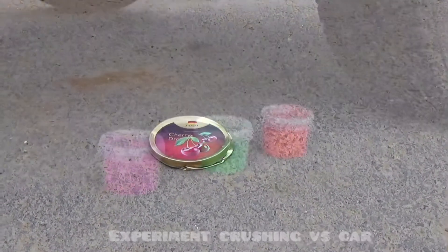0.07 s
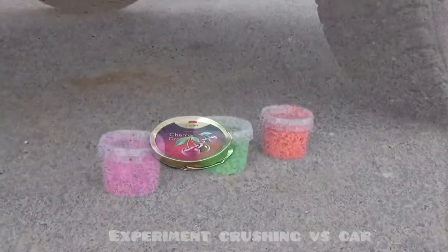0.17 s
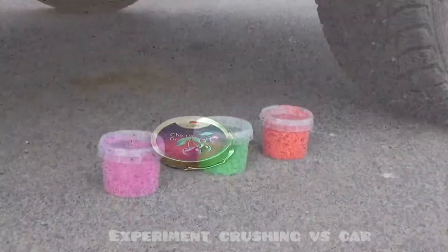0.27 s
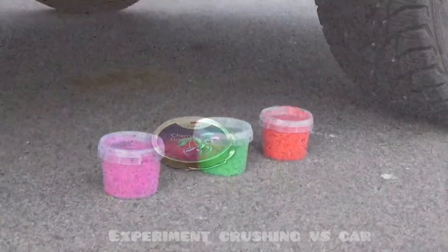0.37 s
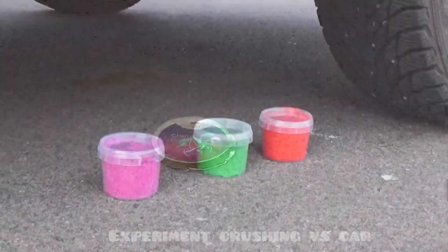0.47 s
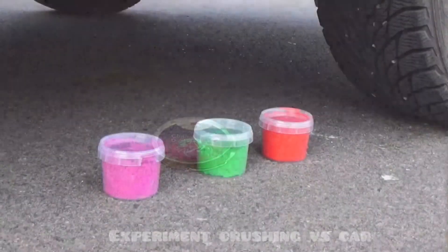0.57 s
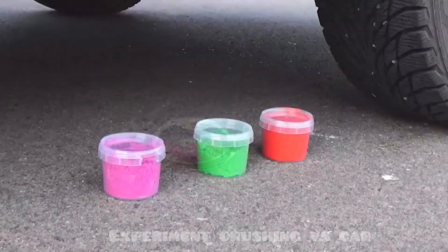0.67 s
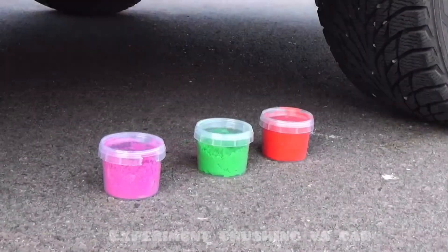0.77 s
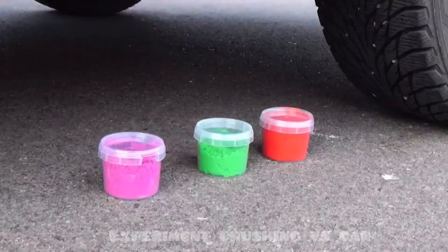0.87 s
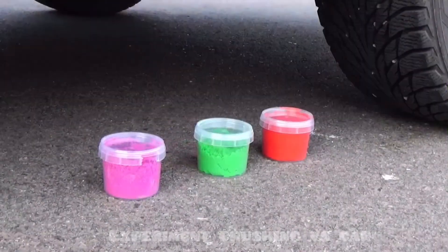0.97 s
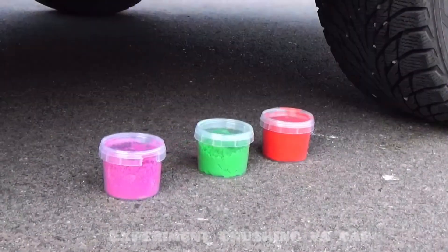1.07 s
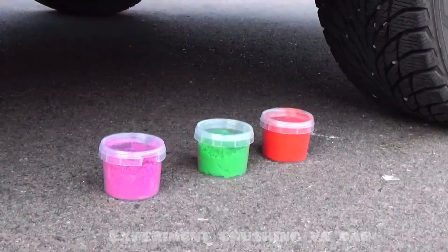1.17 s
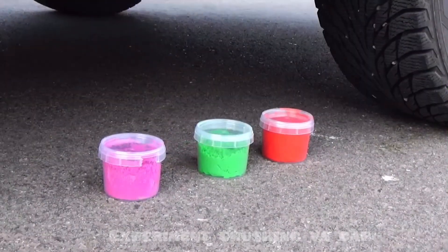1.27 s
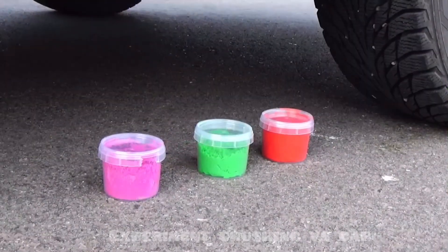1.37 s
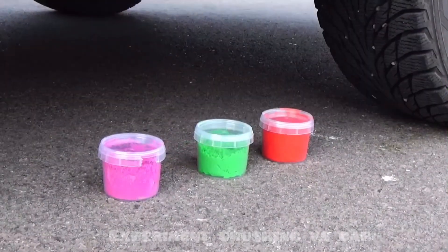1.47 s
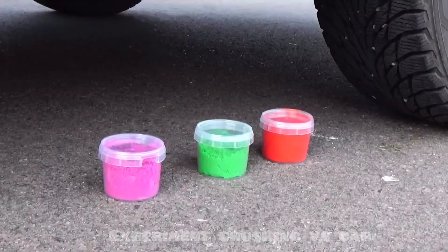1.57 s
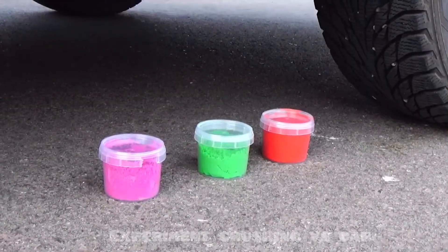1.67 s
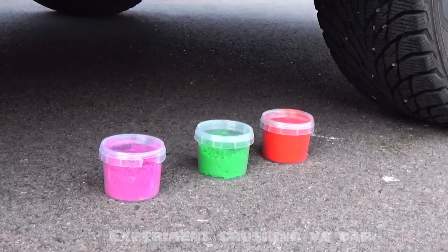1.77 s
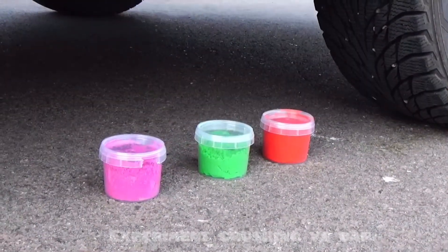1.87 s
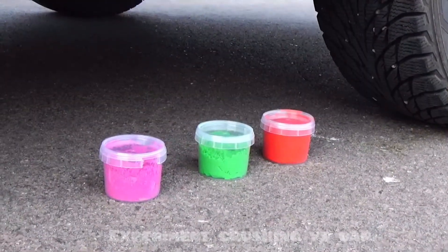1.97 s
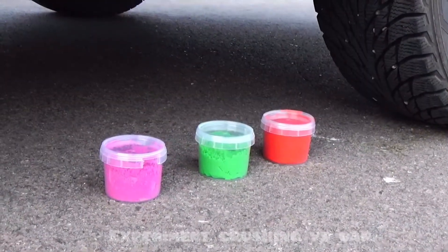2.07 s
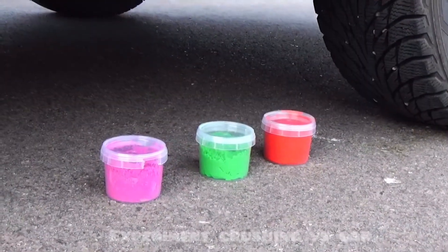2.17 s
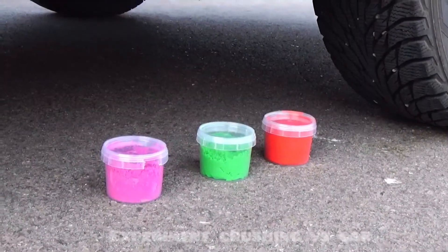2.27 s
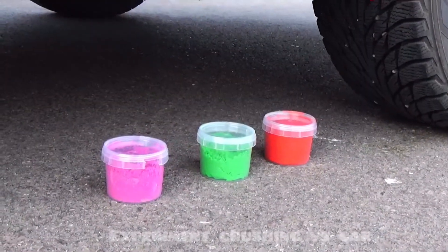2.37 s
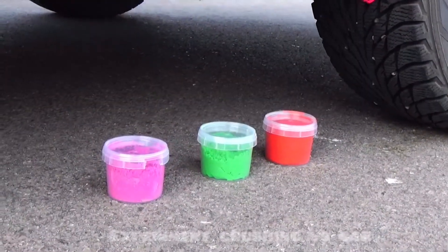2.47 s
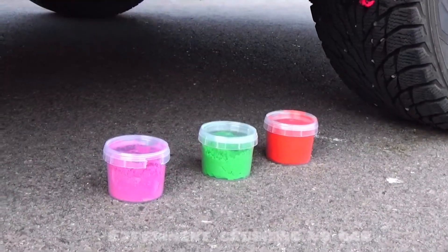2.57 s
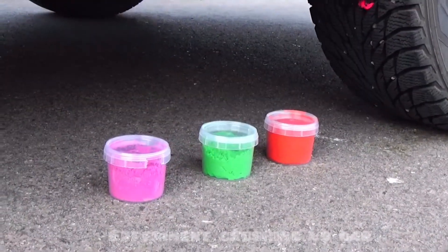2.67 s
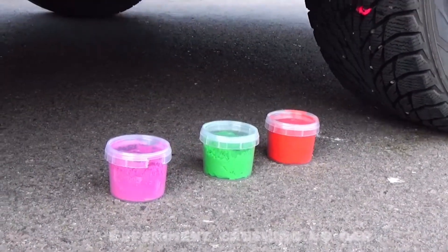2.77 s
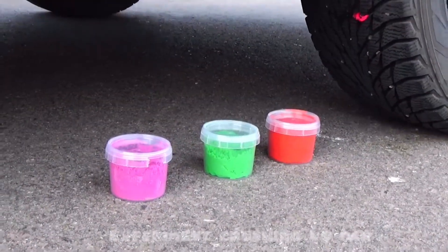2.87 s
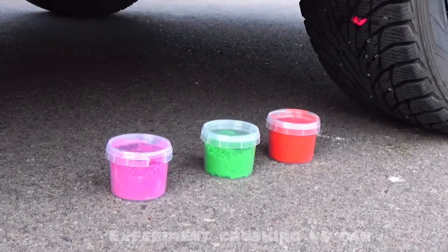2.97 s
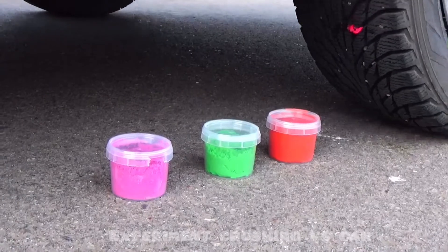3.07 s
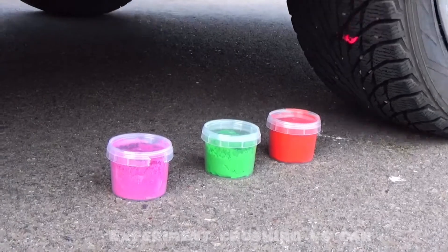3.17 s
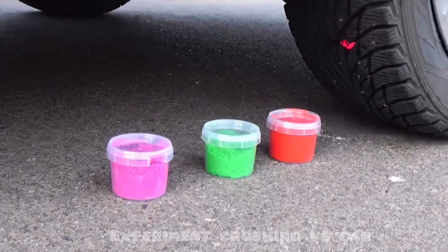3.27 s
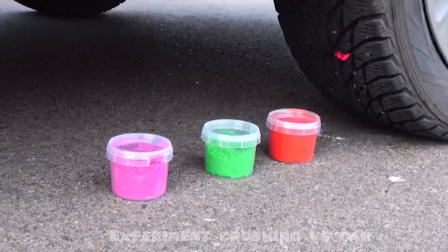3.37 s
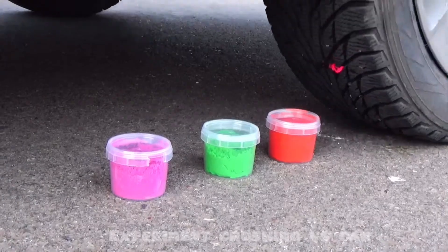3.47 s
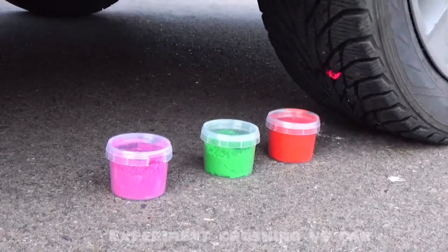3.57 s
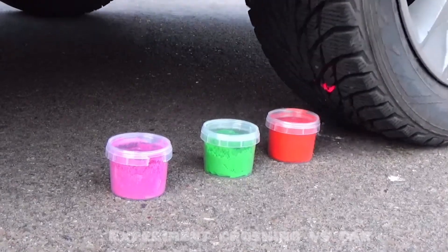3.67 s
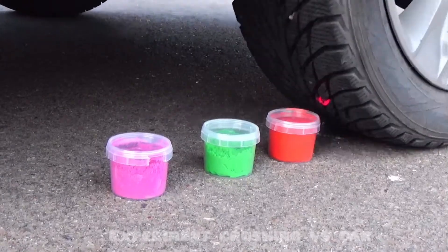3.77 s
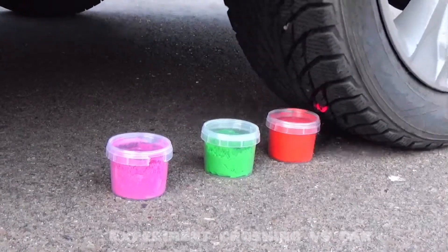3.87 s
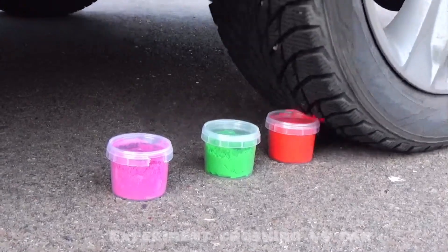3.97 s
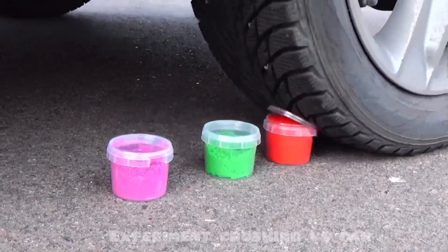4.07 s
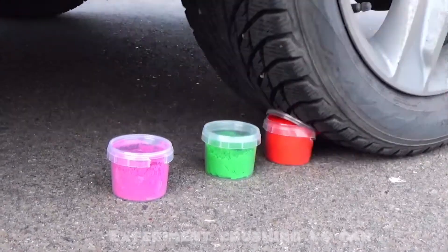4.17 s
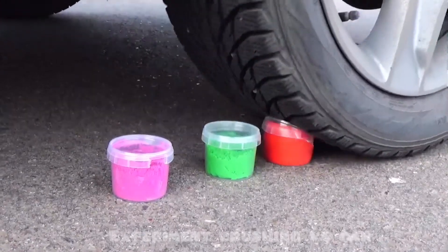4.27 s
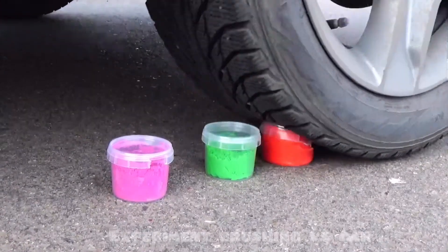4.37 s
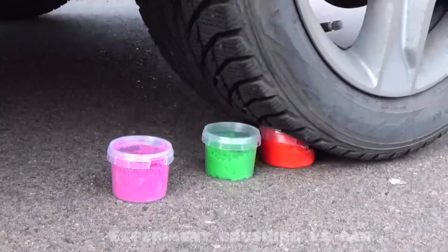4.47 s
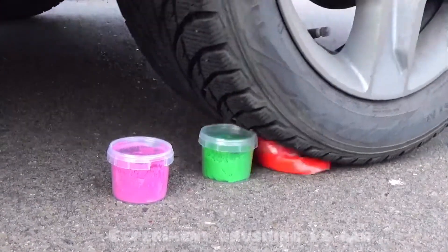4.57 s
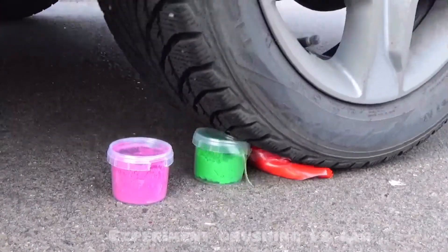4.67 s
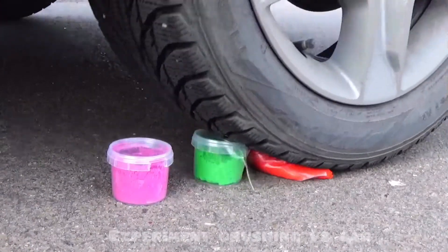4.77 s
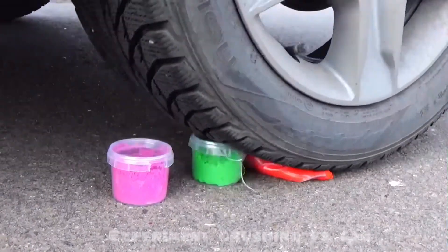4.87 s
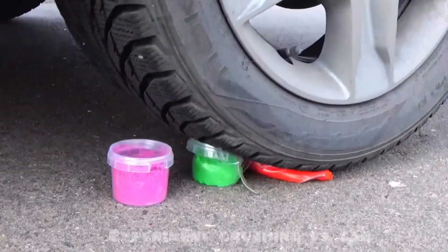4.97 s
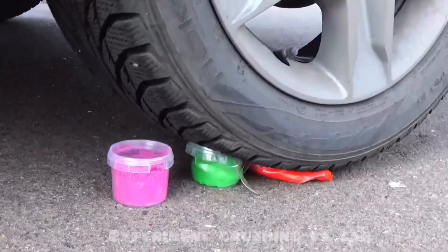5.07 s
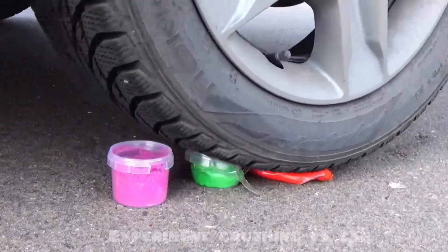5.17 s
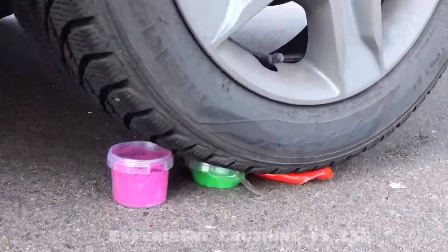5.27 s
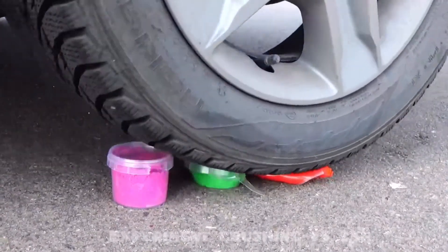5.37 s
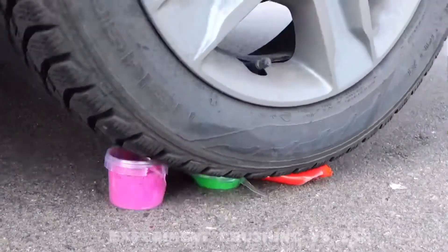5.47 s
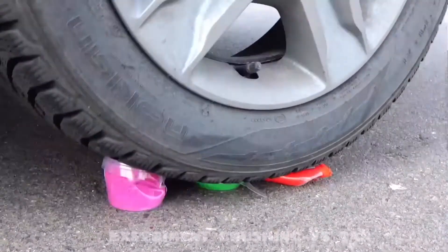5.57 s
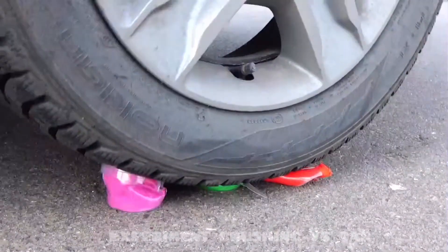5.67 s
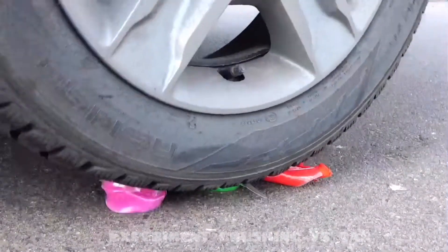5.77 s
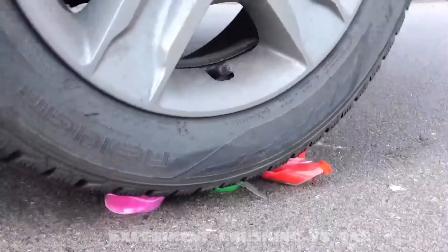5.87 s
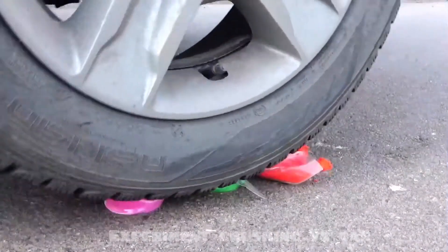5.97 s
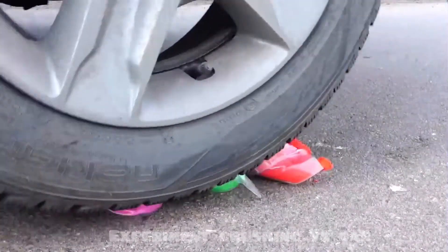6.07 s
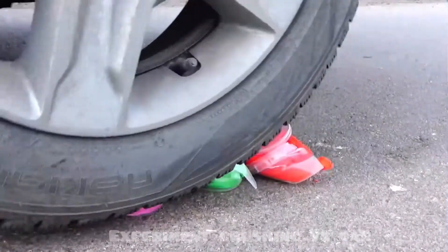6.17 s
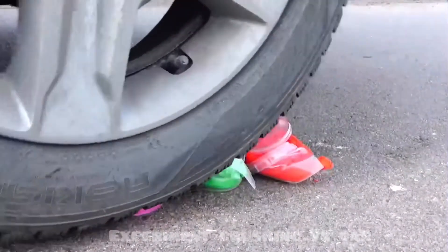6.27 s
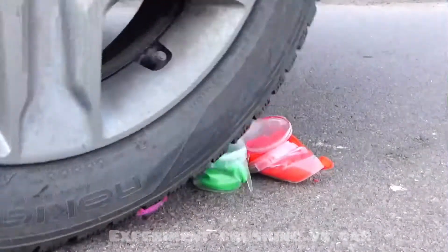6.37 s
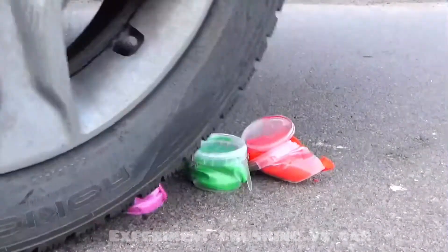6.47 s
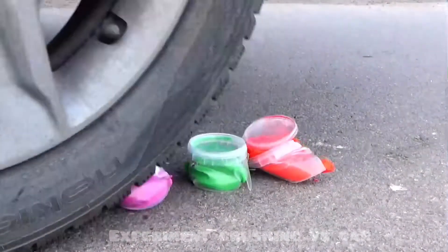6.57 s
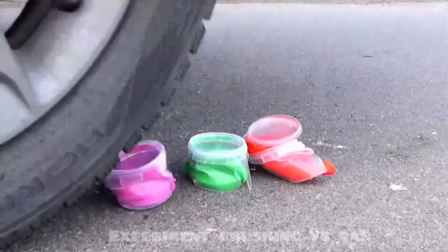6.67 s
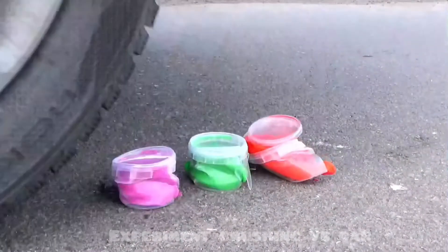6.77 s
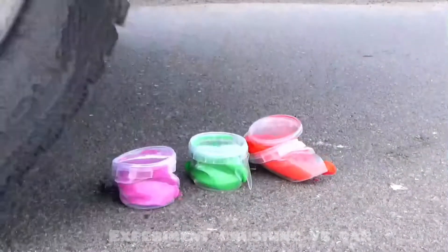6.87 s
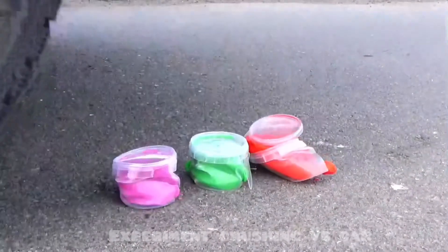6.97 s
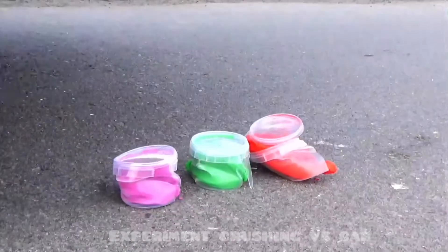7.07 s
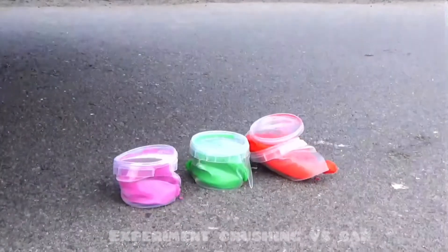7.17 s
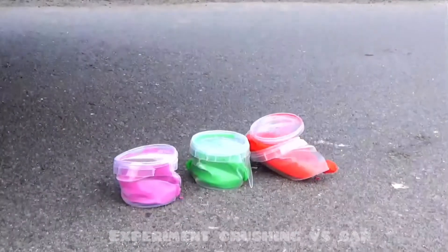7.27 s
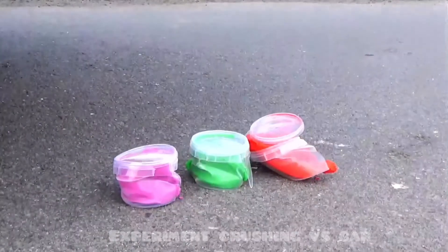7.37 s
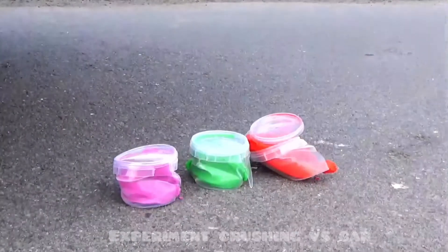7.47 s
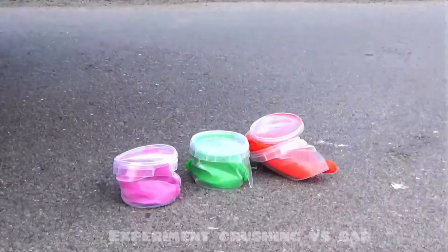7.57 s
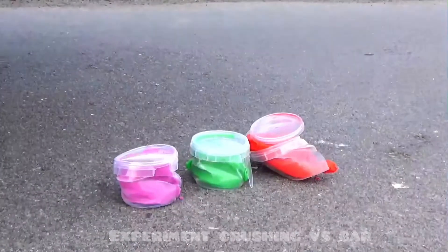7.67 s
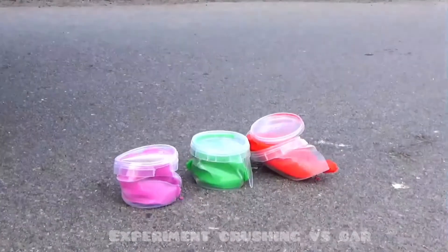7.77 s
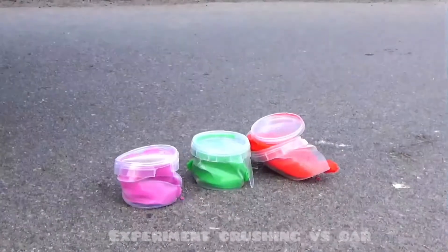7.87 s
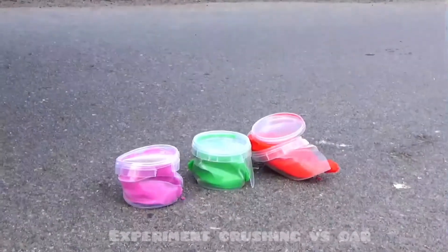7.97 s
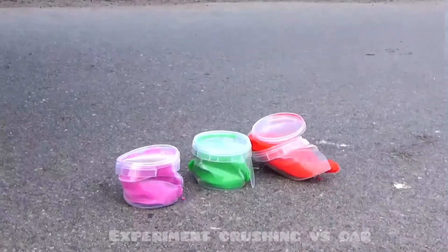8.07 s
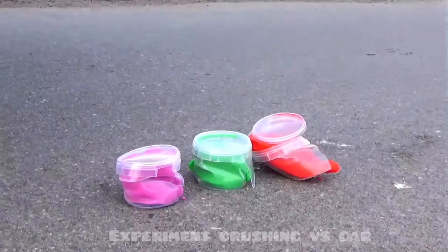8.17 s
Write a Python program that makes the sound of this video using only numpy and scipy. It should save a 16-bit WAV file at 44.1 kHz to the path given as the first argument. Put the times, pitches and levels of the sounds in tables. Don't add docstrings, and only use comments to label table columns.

```python
import sys
import numpy as np
from scipy import signal
from scipy.fft import rfft, irfft, next_fast_len
from scipy.io import wavfile
from scipy.ndimage import uniform_filter1d

SR = 44100
rng = np.random.default_rng(int(sys.argv[2]) if len(sys.argv) > 2 else 0)


def volts_from_decibels(level):
    exponent = np.asarray(level, float) / 20
    return 10 ** exponent


def persist_wave(psi):
    counts = np.round(np.clip(psi, -1, 1) * 32767).astype(np.int16)
    wavfile.write(sys.argv[1], SR, np.atleast_2d(counts).T)


N = 362943

# time in seconds, pitch in Hz.
FIRING_PITCH = [(0, 44.55), (.9, 44.7), (1.5, 44.95), (2.1, 43.65), (2.7, 42.5), (3.3, 42.25),
                (4.05, 42.05), (4.7, 42.55), (5.3, 42.05), (5.7, 41.35), (6.3, 43.0), (6.9, 45.4),
                (7.2, 45.75), (7.5, 45.4), (7.8, 46.25), (8.1, 46.95)]
# time in seconds, firing tone in dB, second order in dB, roar in dB.
ENGINE_LEVELS = [(0, -32.5, -30.5, -39.5), (.32, -34.5, -24, -34), (.8, -25.5, -20, -29),
                 (1.3, -23.5, -24.5, -29.5), (1.95, -23.5, -19.5, -29.5), (2.5, -27, -21, -30),
                 (3.05, -26, -28, -30), (3.55, -31, -24.5, -30), (4.1, -29.5, -23.5, -30.5),
                 (4.45, -26.5, -21, -28), (4.8, -29, -23.5, -33.5), (5.1, -31, -26, -32.5),
                 (5.6, -31.5, -31.5, -33.5), (6, -26.5, -22, -32.5), (6.74, -18.5, -11.5, -33.5),
                 (6.95, -21, -15.5, -33), (8.23, -19.5, -19, -34.5)]
# time in seconds, upper orders in dB, exhaust nearness 0-1, lean to the left in dB.
ROLLING_BY = [(0, -32, 0, 0), (.5, -23, 0, -1), (2.2, -23, 0, -1), (3, -24, .1, 0), (4, -26, .2, 0),
              (5, -28, .3, 0), (6.1, -28, .5, 1), (6.6, -22, .9, 1), (7.2, -20, 1, 1), (8.23, -19, 1, 2.5)]
# multiple of the firing pitch, level in dB.
BAY_ORDERS = [(.5, -11), (1.5, -20), (2.5, -22), (3, -10), (3.5, -19), (4, -18), (4.5, -12), (5, -20),
              (5.5, -15), (6, -27), (7, -26)]
PIPE_ORDERS = [(.5, -10), (1.5, -11), (2.5, -22), (3, -20), (3.5, -16), (4, -24), (4.5, -11), (5, -13),
               (5.5, -21), (6, -17), (7, -26)]
# pitch in Hz, level in dB re upper orders.
PANEL_HUMS = [(152, -21), (278, -18), (351, -12), (453, -16)]
# frequency in Hz, density in dB per Hz.
BAY_SPECTRUM = [(30, -1.5), (100, 1.5), (200, -6), (400, -8), (700, -10), (1000, -12), (1900, -17),
                (2350, -19), (3200, -21), (3500, -26), (4000, -15.5), (4400, -21), (4900, -23),
                (7000, -21.5)]
PIPE_SPECTRUM = [(30, -9.5), (100, 2), (250, -13), (330, -12.5), (720, -10), (880, -16.5), (1300, -16.5),
                 (2050, -24), (2800, -31), (3300, -29), (3900, -22.5), (4400, -30), (4800, -35),
                 (7000, -31)]
# centre in Hz, width in Hz, level in dB.
WHINES = [(670, 33, -37), (1800, 24, -49.5), (2135, 73, -40.5), (3386, 60, -41), (3570, 110, -41.5),
          (3740, 120, -41), (3962, 50, -38.5), (4300, 110, -46), (6510, 10, -45), (6380, 19, -53.5)]
# centre in seconds, level in dB, length in seconds, eddy rate in Hz.
GUSTS = [(.056, -24, 0.13, 130), (0.889, -18, .04, 130), (0.896, -22.5, 0.027, 300), (1.501, -21, .06, 120),
         (2.55, -23, .06, 110.4), (3.0, -19.5, .04, 135.4), (3.025, -17, .04, 85),
         (3.088, -18.5, 0.056, 110.3), (3.09, -21.5, .05, 170), (3.119, -15, 0.035, 89.7),
         (3.298, -23, .1, 90), (3.39, -20, .05, 135), (3.47, -20, .06, 145), (3.559, -17, .07, 91.7),
         (3.612, -17.5, .035, 115), (3.96, -15, .04, 90), (4.009, -19, .04, 115),
         (4.149, -22.5, .06, 119.5), (4.201, -22.5, 0.073, 94.7), (4.469, -24, .08, 251),
         (4.622, -12.5, 0.053, 94.6), (4.75, -21, .05, 64.6), (5.344, -16, .05, 95),
         (6.513, -24.5, .23, 109.2), (6.756, -24, .11, 109.5), (7.529, -24.5, .033, 110),
         (7.745, -25, 0.027, 200)]
# start in seconds, peak in dB, starting ring in Hz,
# t60 in seconds, fall of pitch as a share.
POPS = [(.342, -23, 1800, .25, 0), (.346, -29, 2560, .1, 0), (.33, -15, 240, .1, 0),
        (3.9655, -3, 850, .018, .25), (3.966, -8, 420, .03, .2), (4.7945, -6, 1300, .018, .5),
        (4.796, -13, 480, .02, .3), (5.2742, -2, 1200, .012, .5), (5.2745, -6, 420, .02, .2),
        (5.4585, -5, 480, .026, .5), (5.459, -9, 240, .03, .2), (5.957, -10, 1700, .018, .4),
        (5.84, -12, 1150, .02, .1), (3.974, -10, 900, .016, .3), (5.69, -15, 900, .014, .5),
        (6.1175, -2.5, 560, .022, .3), (6.119, -12, 270, .03, .2), (6.173, -10, 950, .014, .2),
        (6.228, -17, 700, .016, .2), (6.41, -10, 500, .025, .2), (6.414, -12, 1000, .02, .1),
        (6.415, -11, 2300, .014, .05), (5.609, -14, 500, .016, .3), (6.622, -12, 600, .016, .3)]
# peak time in seconds, peak in dB, ring in
# Hz, knock in Hz, knock in dB re ring.
SNAPS = [(3.5929, -15.5, 3510, 2170, 10.0), (3.8369, -8.5, 5210, 1505, -6),
         (3.9488, -14, 3770, 2370, -6), (3.961, -4.5, 3830, 2700, 4.4), (3.9673, -8.5, 4160, 1370, 6),
         (3.9729, -0.5, 6370, 2790, -5.1), (4.0317, -0.5, 6330, 2010, 1.5),
         (4.0779, -1, 3910, 2940, -9), (4.0852, -6, 6380, 1590, -5.7), (4.1416, -4, 4900, 1415, 0),
         (4.2669, -7.5, 4390, 2000, -4), (4.3346, -7.5, 6910, 1700, -14.5),
         (4.4124, -12.5, 4030, 1820, -6), (4.4344, -11, 3840, 2140, -1.4),
         (4.448, -3, 5180, 2000, -2), (4.4565, -6.5, 3780, 2670, -1.8), (4.4723, -9, 6740, 2690, 0),
         (4.5614, -1.5, 6330, 3200, -13.5), (4.5644, -2, 7170, 2670, -9),
         (4.5863, -3.9, 4480, 1240, -13), (4.597, -6.5, 4050, 2650, -10.8),
         (4.6526, -0.5, 5760, 905, -6.5), (4.658, -3, 5360, 900, -15.0),
         (4.817, 1, 6530, 1083, -3.5), (4.8452, -29, 4600, 900, 8.6),
               (4.9046, -6.5, 5700, 950, -10.9), (4.9432, -3, 4880, 2250, -5),
               (4.9831, -16.1, 4970, 900, -1), (5.0286, -7, 5560, 1080, -10.8),
               (5.1907, -2, 3670, 1370, -1.5), (5.281, -4.5, 5730, 1120, -12),
               (5.4811, -2, 3900, 1810, -10), (5.4884, -0.4, 6650, 1290, -8),
               (5.519, -5.5, 6240, 1490, -0.6), (5.5917, -10, 5620, 1530, -21),
               (5.65, -18.5, 6670, 2930, -10), (5.6889, -17.1, 3380, 1060, 5), (5.833, -5.5, 5700, 904, -7),
               (5.8401, -6.1, 4160, 1110, -3), (5.8595, -2, 3940, 1290, -11), (5.9583, -9.5, 4650, 900, 11),
               (6.1175, -12.5, 3960, 1650, 14), (6.315, -25, 3810, 1060, 5), (6.3417, -13, 4100, 2680, 12),
               (6.398, -23.5, 3770, 1870, -1), (6.4096, -6, 5490, 2600, 1.5),
               (6.4161, -3.5, 3160, 2350, 7.5), (6.4323, -13.5, 6200, 900, 0),
               (6.6234, -6.5, 3940, 907, -5), (6.6448, -18, 6850, 900, 0)]
# start in seconds, level in dB, tyre ring in Hz, t60 in seconds.
THUMPS = [
    (3.962, -22, 88, 0.16),
    (4.462, -17.5, 143, 0.72),
    (4.615, -10.5, 110, 0.13),
    (4.7, -15.5, 151.4, 0.57),
    (5.346, -13.5, 150, 0.76),
    (6.412, -11, 152, 0.11),
    (6.46, -21, 151, .7),
]
# start in seconds, rise in seconds, fall in seconds, top hiss in dB, middle part in dB re hiss.
SQUIRTS = [(3.976, .015, 0.052, -17.5, -2.5), (4.036, 0.012, .034, -23, -3),
           (4.452, 0.0091, 0.041, -17, -2), (4.567, .043, .036, -15.5, -7), (5.195, 0.033, .035, -19, 0.5),
           (5.285, 0.031, 0.039, -18.5, -7), (5.493, 0.0029, 0.038, -30, -3),
           (5.863, .004, 0.023, -26.5, -20), (6.406, 0.011, 0.022, -21.5, 1),
           (5.834, 0.0073, 0.013, -22.5, -1.5)]
# frequency in Hz, density in dB per Hz.
JET_SPECTRUM = [(200, 0), (420, -3), (1000, -2), (1300, -1), (1600, -5), (2100, -2), (2500, -7),
                (3000, -11), (4100, -3), (4600, -5), (5200, -9), (7000, -10)]
# centre in seconds, level in dB, ring in Hz, length in seconds.
CAVITIES = [(4.001, -23, 1790, .04), (3.993, -23.5, 2500, .03), (4.467, -23.5, 3970, 0.028),
            (4.8, -24, 500, .04), (4.601, -23.5, 3900, .06), (4.6, -24, 1230, .05),
            (5.223, -23.5, 2058, .045), (5.223, -29, 1150, .04), (5.305, -21.5, 400, .06),
            (5.315, -25, 620, .035), (5.317, -20.5, 4120, .05), (5.299, -27, 2300, 0.045),
            (5.222, -22.5, 3950, .045), (4.045, -28, 4050, 0.023), (5.51, -28, 4000, .04),
            (5.4, -34.5, 4300, .04), (3.99, -23, 3600, .03)]
# centre in seconds, depth in dB, length in seconds.
BASS_CUTS = [(0.918, -9, 0.024), (2.802, -6.5, 0.25), (3.179, -8, 0.025), (3.784, -5.5, 0.12),
             (4.06, -15.5, 0.074), (4.157, -11, 0.068), (4.407, -4.5, 0.063), (4.556, -21, 0.033),
             (4.686, -19.5, .05), (5.3, -17.5, .09), (5.5, -23, 0.099), (5.666, -7.5, 0.045),
             (5.895, -22.5, .05)]
# frequency in Hz, likeness 0-1.
LIKENESS = [(45, 0.995), (90, 0.96), (160, 0.96), (420, 0.93), (1130, 0.91), (2990, 0.99), (7950, 0.95)]
# frequency in Hz, left-right difference in dB.
CAR_LEAN = [(45, 1.5), (85, 2.5), (140, -2.5), (310, 7), (690, 6), (1560, 3.5), (3520, 1.5), (7950, 0)]
TUB_LEAN = [(60, -10), (200, 3.5), (690, 4.5), (2340, 3), (7950, 2)]
# frequency in Hz, gain in dB.
BAND_EDGE = [(7330, 0), (7370, -22), (7460, -35), (8600, -44), (10500, -85)]
TOP_HZ = 7000


def evened(x):
    return x / np.sqrt(np.mean(x ** 2) + 1e-20)


def read(points, hz):
    f, value = np.transpose(points)
    return np.interp(np.log(hz + 1), np.log(f + 1), value)


def curves(rows, t):
    s, *columns = np.transpose(rows)
    return [np.interp(t, s, c) for c in columns]


def add(mix, s, sound):
    part = mix[round(s * SR):][:len(sound)]
    part += sound[:len(part)]


def wander(smooth, count=1):
    width = max(int(smooth / 16), 1)
    steps = rng.standard_normal((count, N // 16 + 2))
    steps = uniform_filter1d(uniform_filter1d(steps, width), width)
    return np.squeeze([np.interp(np.arange(N) / 16, np.arange(len(s)), evened(s)) for s in steps])


def band(x, lo_hz, hi_hz, order=2):
    return signal.sosfilt(signal.butter(order, [lo_hz, hi_hz], "band", fs=SR, output="sos"), x)


def padded_hz():
    size = next_fast_len(N // 2 + 1, True) * 2
    return size, np.fft.rfftfreq(size, 1 / SR)


def colour(x, points):
    size, hz = padded_hz()
    return irfft(rfft(x, size) * volts_from_decibels(read(points, np.minimum(hz, TOP_HZ))), size)[:N]


def bass_cut(t):
    return sum(db * np.exp(-((t - s) / (0.51 * length)) ** 2) for s, db, length in BASS_CUTS)


def engine_orders(t):
    hz, = curves(FIRING_PITCH, t)
    first_db, second_db, _ = curves(ENGINE_LEVELS, t) + bass_cut(t)
    upper_db, near, _ = curves(ROLLING_BY, t)
    turns = np.cumsum(hz * (1 + 0.0023 * wander(1502))) / SR
    tone = volts_from_decibels(first_db + 1.2 * wander(2400)) * np.cos(2 * np.pi * turns)
    tone += volts_from_decibels(second_db + 0.88 * wander(1500)) * np.cos(4 * np.pi * turns + 0.9)
    shakes = wander(1600, count=len(BAY_ORDERS))
    for (k, bay_db), (_, pipe_db), shake in zip(BAY_ORDERS, PIPE_ORDERS, shakes):
        level_db = upper_db + (1 - near) * bay_db + near * pipe_db + 1.5 * shake
        tone += volts_from_decibels(level_db) * np.cos(2 * np.pi * (k * turns + rng.random()))
    tone += panel_hums(t, upper_db, near)
    return np.sqrt(2) * tone, turns


def panel_hums(t, upper_db, near):
    hum = np.zeros(N)
    for (hz, db), shake in zip(PANEL_HUMS, wander(1100, count=len(PANEL_HUMS))):
        level = volts_from_decibels(upper_db + db + 3.2 * shake) * (1 - near) ** 2
        hum += level * np.cos(2 * np.pi * hz * t + .8 * shake[::-1])
    return hum


def engine_roar(t, turns):
    frames, hz = N // 512 + 5, np.fft.rfftfreq(2048, 1 / SR)
    at = np.arange(frames) * 512 / SR
    near = curves(ROLLING_BY, at)[1]
    low_db = curves(ENGINE_LEVELS, at)[2] + 0.067 * bass_cut(at)
    high_db = low_db + 3 * (1 - near) - 1.23 * near
    a, b, c, d, patches = rng.standard_normal((frames, 1025, 5)).T
    patches = evened(uniform_filter1d(uniform_filter1d(patches, 18, 0), 5, 1))

    held = np.minimum(hz, TOP_HZ)
    shape = volts_from_decibels(np.outer(read(BAY_SPECTRUM, held), 1 - near) + np.outer(read(PIPE_SPECTRUM, held), near))
    below = hz < 1500
    for part, gauged, db in (below, below & (hz > 300), low_db), (~below, ~below, high_db):
        shape[part] *= volts_from_decibels(db) / np.sqrt((shape[gauged] ** 2).sum(0))
    for f, width, db in WHINES:
        peak = np.exp(-((hz - f) / (width + 12)) ** 2)
        shape += np.outer(peak / np.linalg.norm(peak), volts_from_decibels(db + high_db + 20.5) * (1 - near))

    z = np.array([a + 1j * b, c + 1j * d]) * shape * volts_from_decibels(1.17 * patches)
    noise = 1.39 * signal.istft(z, nperseg=2048, noverlap=1536)[1][:, :N]
    puffs = 1 + 0.035 * np.cos(2 * np.pi * turns) + 0.047 * np.cos(np.pi * turns)
    return noise * puffs * volts_from_decibels(0.15 * wander(510))


def gusts(t):
    lumps, out = rng.standard_normal((2, N)), np.zeros((2, N))
    for s, db, length, hz in GUSTS:
        now = slice(max(round((s - length) * SR), 0), round((s + length) * SR))
        shape = np.exp(-((t[now] - s) / (0.43 * length)) ** 2)
        swing = np.sqrt(2) * np.cos(2 * np.pi * hz * (t[now] - s))
        ragged = evened(band(lumps[:, now], hz / 1.8, hz * 1.83))
        out[:, now] += volts_from_decibels(db) * shape * (swing * [[1], [.6]] + 0.49 * ragged)
    return out


def pops():
    out, u = np.zeros(N), np.arange(2400) / SR
    for s, db, hz, t60, sag in POPS:
        fade = volts_from_decibels(db - 60 * u / t60) * np.minimum(u / 0.00024, 1)
        pitch = hz * (1 - sag * (1 - np.exp(-u / 0.0023)))
        add(out, s, -fade * np.sin(2 * np.pi * np.cumsum(pitch) / SR))
    return out


def snaps():
    out, u = np.zeros(N), np.arange(2400) / SR
    for s, db, hz, knock_hz, knock_db in SNAPS:
        fade = volts_from_decibels(-60 * u / 0.008) + 0.08 * volts_from_decibels(-60 * u / 0.042)
        burst = np.sign(rng.standard_normal(len(u))) * fade * np.minimum(u / 0.0007, 1) ** 2
        burst[34] += 1.6
        wide = band(burst, 2600, 9000) + 0.5 * band(burst, 500, 2600)
        struck = volts_from_decibels(-60 * u / 0.0083) * np.minimum(u / 0.00042, 1)
        knock = volts_from_decibels(knock_db) * min(knock_hz / 1150, 1) * np.sin(2 * np.pi * knock_hz * u)
        rings = np.sin(2 * np.pi * hz * u) + knock
        crack = 1.2 * volts_from_decibels(-0.6 * max(knock_db, 0)) * wide / abs(wide).max()
        snap = crack + struck * rings / abs(rings).max()
        add(out, s - 0.0008, volts_from_decibels(db + 4.5) * snap / abs(snap).max())
    return out


def thumps():
    out, u = np.zeros(N), np.arange(SR // 2) / SR
    for s, db, hz, t60 in THUMPS:
        add(out, s, volts_from_decibels(db - 60 * u / t60) * np.minimum(u / 0.0018, 1) * np.sin(2 * np.pi * hz * u))
    return out


def squirts(t):
    grain_db = 2.2 * wander(34) + 1.5 * wander(260)
    air = colour(rng.standard_normal(N) * volts_from_decibels(grain_db), JET_SPECTRUM)
    edges_hz = (3000, 9000), (1500, 3000), (250, 1500)
    parts = np.array([evened(band(air, *edges, order=3)) for edges in edges_hz])
    hiss, middle, low = parts * volts_from_decibels(2.0 * wander(90, count=3))
    out = np.zeros(N)
    for s, rise, fall, db, middle_db in SQUIRTS:
        now = slice(round(s * SR) - 100, round((s + rise + fall) * SR) + 100)
        u = t[now] - s
        dying = np.clip((u - rise) / fall, 0, 1)
        level_db = db + 0.3 - 0.5 * np.clip(1 - u / rise, 0, 1) - 16 * dying ** 1.23
        gate = np.clip(np.minimum(u, rise + fall - u) / 0.0023 + .5, 0, 1)
        lingers_db = 2 * dying
        middle_gain, low_gain = volts_from_decibels(middle_db + .4 * lingers_db), volts_from_decibels(-6 + lingers_db)
        jet = hiss[now] + middle_gain * middle[now] + low_gain * low[now]
        out[now] += gate * volts_from_decibels(level_db) * jet
    return out


def cavities():
    sharpness, slide = 4.5, .12
    out, u = np.zeros(N), np.arange(-4000, 4000) / SR
    for s, db, hz, length in CAVITIES:
        breath = rng.standard_normal((2, len(u)))
        r = np.exp(-np.pi * hz / sharpness / SR)
        fuzz = signal.lfilter([1], [1, -2 * r, r * r], breath[0] + 1j * breath[1])
        pitch = hz * (1 - slide * np.tanh(u / length))
        ring = (fuzz * np.exp(2j * np.pi * np.cumsum(pitch) / SR)).real
        add(out, s + u[0], volts_from_decibels(db) * evened(ring) * np.exp(-(u / (0.67 * length)) ** 2))
    return out


def ground_scatter(x):
    u = np.arange(3000) / SR
    tails = rng.standard_normal((2, 3000)) * volts_from_decibels(-60 * u / 0.1) * (u > .001)
    return [signal.oaconvolve(x, evened(k) / np.sqrt(3000))[:N] for k in tails]


def ports(x, lean, other):
    size, hz = padded_hz()
    same = read(LIKENESS, hz)
    mid = np.sqrt((1 + same) / 2) * rfft(x, size)
    side = np.sqrt((1 - same) / 2) * rfft(other, size)
    balance = volts_from_decibels(np.outer([.5, -.5], read(lean, hz)))
    return irfft(np.array([mid + side, mid - side]) * balance, size)[:, :N]


def scene():
    t = np.arange(N) / SR
    tone, turns = engine_orders(t)
    noise = engine_roar(t, turns) + gusts(t)
    crush = pops() + snaps() + thumps() + squirts(t) + cavities()
    echo, other = ground_scatter(crush)
    car = ports(tone + noise[0], CAR_LEAN, np.roll(tone, 180) + noise[1])
    car *= volts_from_decibels(np.outer([.5, -.5], curves(ROLLING_BY, t)[2]))
    return car + ports(crush + volts_from_decibels(-11.0) * echo, TUB_LEAN, 0.4 * other)


def roll_off(x):
    return signal.sosfilt(signal.butter(12, 8550, fs=SR, output="sos"), x)


def record(dry):
    peak_db = 20 * np.log10(abs(dry).max(0) + 1e-6)
    fall = np.arange(N) * 200.0 / SR
    over_db = np.maximum(np.maximum.accumulate(peak_db + fall) - fall + 3, 0)
    ducked = dry / volts_from_decibels(.3 * uniform_filter1d(over_db, 60))
    overloaded = 1.754 * np.tanh(ducked / 2.008)
    size, hz = padded_hz()
    narrow = irfft(rfft(overloaded, size) * volts_from_decibels(read(BAND_EDGE, hz)), size)[:, :N]
    return roll_off(np.clip(narrow, -.98, .98))


dry = scene()
out = record(dry)
persist_wave(out)
```